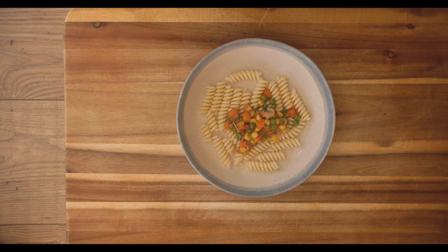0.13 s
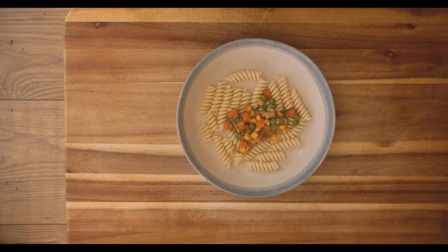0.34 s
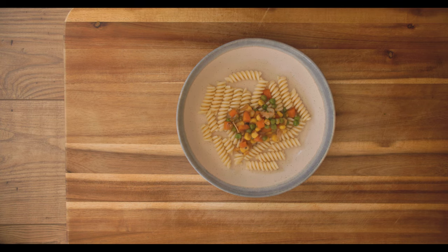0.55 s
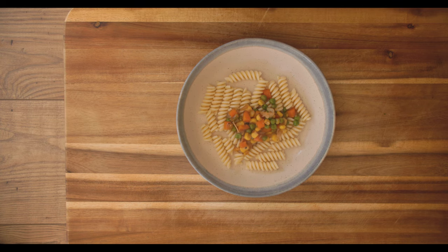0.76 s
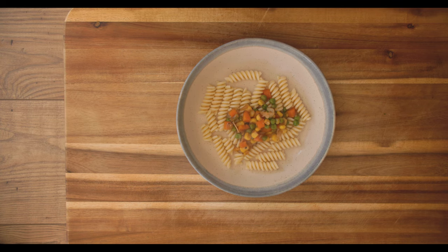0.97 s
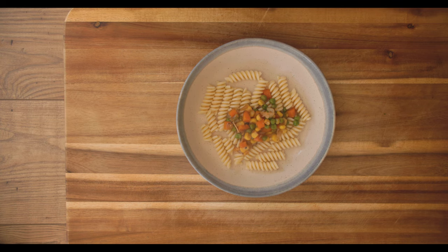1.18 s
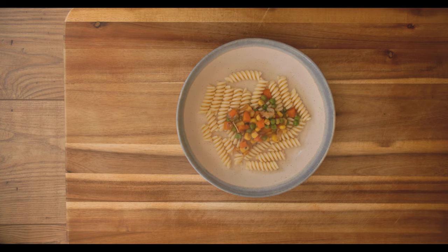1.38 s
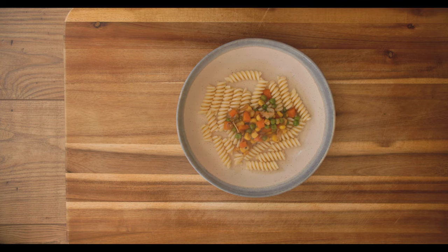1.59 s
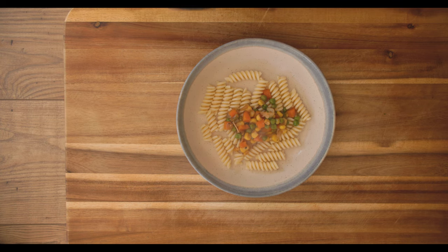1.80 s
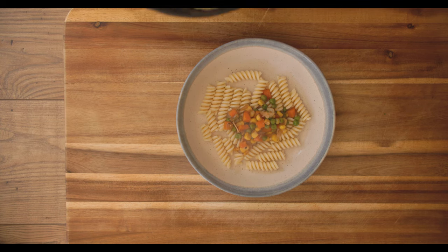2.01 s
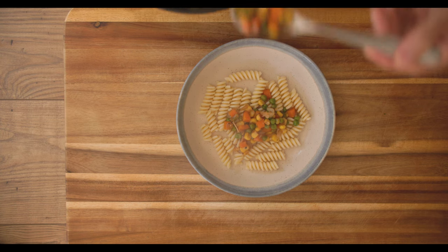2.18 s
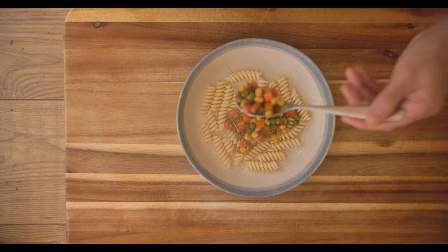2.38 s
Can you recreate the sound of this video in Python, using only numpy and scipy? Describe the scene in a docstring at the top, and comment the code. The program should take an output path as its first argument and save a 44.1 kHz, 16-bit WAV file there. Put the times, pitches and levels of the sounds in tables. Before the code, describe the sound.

Close and dry, a metal utensil hits a pan twice and scrapes hard, stops, then knocks once more, slides lightly and lifts with faint thin squeaks, over low room hum and soft hiss in a small kitchen.

```python
"""A metal utensil works a pan of sauce in a small kitchen, in two strokes over a bed of room hum and hiss.
The first stroke knocks twice and drags; the second knocks once, drags and lifts with thin squeaks.
Blows ring tuned pan modes; glancing touches wake a few of them; slides are grit noise that rasps and rings.
Wet ticks are tiny noise bursts, squeaks are gliding sines, and a dying noise tail puts it in the room."""
import sys
import numpy as np
from scipy import signal
from scipy.fft import rfft, irfft
from scipy.io import wavfile

SR = 44100
rng = np.random.default_rng(int(sys.argv[2]) if len(sys.argv) > 2 else 0)


def ratio_of_db(decibels):
    """Turn decibels (scalar or array-like) into linear amplitude factors; 0 dB maps to 1."""
    return 10 ** (np.asarray(decibels, float) / 20)


def store_wav(level_fs):
    """Save 16-bit WAV to argv[1]."""
    pcm = np.round(np.clip(np.atleast_2d(level_fs), -1, 1) * 32767)
    wavfile.write(sys.argv[1], SR, pcm.T.astype(np.int16))


N = 108045   # length [samples]

# mode pitches of pan and utensil: one list of [Hz]
MODE_HZ = [664, 1300, 1621, 1852, 1895, 2197, 2378, 2810, 2915, 3216, 3400, 3650, 3994, 4197, 4400, 4720,
           4926, 5249, 5500, 5870, 6240, 6850, 7245, 8060, 9290, 11870, 12300]
# how each mode answers: (relative level struck at the rim [dB], on the bottom [dB], reference t60 [s])
MODES = [(-15, -14, 0.39), (-14, 0.5, 0.055), (-15.5, -27, 0.19), (-27.5, -43, 0.066), (-12.5, -3, 0.25),
         (-5.5, -24, 0.2), (-21, -4, 0.15), (-38, -62, 0.12), (-23, -3.5, 0.21), (6, -19.5, 0.096),
         (-2.5, -25, 0.057), (-11, -32.5, 0.12), (-2, -30, 0.077), (-6, -11.5, 0.1), (-21, 6, 0.075),
         (-4, -65.5, 0.13), (-30, -34.5, 0.103), (-31.5, 9, 0.0522), (-17.5, -10, 0.0498), (-9, -6, 0.074),
         (-19.5, -10, 0.32), (-41.5, -14, 0.106), (-46, -15, 0.039), (-30, -1.5, .12), (-34.5, -10, 0.081),
         (-26, -24, 0.046), (-52.5, -12, 0.034)]
# blows: (time [s], level [dB], place [0 rim - 1 bottom], share of reference t60 [ratio],
#         crack over ringing [dB], top of push and crack [Hz])
BLOW_EVENTS = [(0.1974, 0.5, 0.025, 1.45, 7.5, 5100), (0.3195, 2.5, 0.19, 0.21, -8, 9100),
               (1.0495, -2.5, 0.98, 0.49, 4, 7750)]
BLOW_GAIN_DB, CHATTER_S = -13, 0.00279
FREE_S, GRIP_DB_PER_S = 0.028, 190   # a blow rings freely at first, then hand and sauce damp it
RING_WOBBLE_DB = 3.0   # shifting grip and sauce make each ring fade unevenly
CRACK_LOW_HZ, CRACK_T60_S = 1496, 0.012
BODY_DB, BODY_T60_S = -27, 0.033   # quieter, longer noise behind the crack
THUMP_DB, THUMP_HZ = -34.5, 100

# glancing touches; the first row is the second blow waking the high scoop modes: (time [s], peak level [dB],
# first pitch woken [Hz], second pitch [Hz], contact [s])
TOUCH_EVENTS = [(0.3205, -6, 8100, 11260, 0.0018), (0.335, -3, 4200, 5130, 0.0085),
                (.41, -9.5, 3400, 4300, 0.02), (0.4272, -6.5, 3080, 4400, 0.0093),
                (0.464, -6, 3260, 4200, 0.0081), (0.49, -18, 3230, 4240, 0.0044),
                (0.5016, -8, 3270, 4320, 0.0041), (1.137, -14.5, 7050, 5400, 0.0034),
                (1.148, -13.5, 2900, 6930, 0.0041), (1.16, -33, 6960, 1900, 0.0019),
                (1.19, -20.5, 1280, 2900, 0.022), (1.203, -25, 1760, 2900, 0.0084),
                (1.255, -29.5, 2480, 3550, 0.0068), (1.34, -27.5, 3360, 3770, 0.05),
                (1.36, -20, 3930, 7030, 0.015), (1.374, -18, 4100, 4680, 0.001),
                (1.399, -25.5, 2050, 4200, 0.015), (1.498, -32.5, 2950, 3220, 0.014),
                (1.512, -35.5, 3270, 3030, 0.014), (1.535, -33.5, 3230, 3120, 0.052)]
TOUCH_T60_SHARE, TOUCH_SPREAD_OCTAVES = 0.23, 0.08

# slides, one curve each: (time [s], level [dB], treble over level [dB], place [0 rim - 1 bottom],
#                          scoop ringing over treble [dB])
SLIDE_CURVES = [
    [(0.21, -16.5, -20, 0.29, -30), (0.268, -32.5, -4.5, 0.32, -14), (0.303, -24.5, -12, 0.43, -15)],
    [(0.303, -18, -10.5, 0.6, -7), (0.3175, -18, 0, 0.35, -1)],
    [(0.322, -18.5, -2.5, 0.14, -4), (0.44, -17.5, -9, 0.54, -10.5), (0.455, -27, -17.5, 0.63, -7.5)],
    [(0.458, -23, -14, 0.53, 1), (0.466, -18.5, -21, 0.41, 0.5), (0.505, -29, -19.5, 0.53, 1.5),
     (0.62, -56, -18, 0.45, -10.5)],
    [(1.056, -9, 1.5, 0.62, -15.5), (1.066, -18.5, -6.5, 1, -14), (1.205, -27.5, -5, 0.74, -3),
     (1.235, -40.5, -5.5, 1, -5.5), (1.29, -38.5, -5.5, 0.68, -3.5)],
    [(1.29, -40, 3.5, 0.88, -6.5), (1.38, -34, -5.5, 0.35, -2), (1.496, -48.5, 1.5, 0.53, -8.5)],
    [(1.496, -46, 9, 0.41, 10), (1.502, -42, 1, 0.48, -5.5), (1.572, -41.5, 1.5, 0.4, -7),
     (1.59, -44, -0.5, 0.55, -12), (1.79, -55.5, -6, 0.5, -16)],
]
# tone of the rasp: (frequency [Hz], relative density [dB per Hz])
RASP_SPECTRUM = [(240, -34), (400, -10.5), (664, -13.5), (1520, -8), (1860, -3), (5350, -12), (10700, -22),
                 (12100, -32), (15700, -48)]
RASP_DB, RUNG_DB, SPLIT_HZ = -8.5, -4.5, 5020
PRESS_T60_SHARE = 0.68   # the pressed edge shortens the rings
FIRM_DB, RUNG_FOLLOWS = -18, 0.4   # light pressure rasps more than it rings
GRIT_PER_S, GRIT_SPREAD_DB, GRIT_CAP = 6000, 3.2, 4.0
FLUTTER_DB, FLUTTER_HZ, SLIP_DB, SLIP_HZ = 1.8, 90, 1.2, 25   # fast and slower level drift

# broad resonances of the rubbed scoop: (frequency [Hz], width [Hz], relative level [dB])
SCOOP_RESONANCES = [(6950, 350, -3), (8050, 280, -2), (11900, 300, -5), (12800, 500, -16),
                    (15200, 900, -19)]
# pitch of the scoop as sauce loads it: (time [s], pitch share [ratio])
SCOOP_LOAD = [(1.05, 1), (1.2, .99), (1.3, .965), (1.46, .95), (1.56, .975)]
SCOOP_PATCHY_DB, SCOOP_SLIP_DB = 3.5, 2.5

# the lowest pan mode humming under the sliding edge, one curve each: (time [s], level [dB])
BELLY_CURVES = [
    [(0.29, -31), (0.32, -30), (0.442, -27.5), (0.5, -44.5), (0.53, -80)],
    [(1.07, -35), (1.104, -41), (1.212, -35.5), (1.27, -66)],
    [(1.37, -48.5), (1.4, -43.5), (1.49, -57), (1.53, -41), (1.58, -52)],
]
BELLY_T60_S, BELLY_FLICKER_DB = 0.05, 2.5
# a dull rumble under the drag, one curve each: (time [s], level [dB])
RUMBLE_CURVES = [
    [(.2, -46), (.31, -42)],
    [(1.49, -51.5), (1.77, -56)],
]
RUMBLE_HZ = 353
PAN_LOW_CUT_HZ = 427

# sharp ticks: first a loud tap of the utensil on the pan, then grit and wet sauce: (time [s], peak level [dB],
# centre [Hz], width [octaves])
TICK_EVENTS = [(0.369, -4, 3920, 1.4), (0.552, -48, 14530, 0.18), (.571, -43, 13660, 0.57),
               (.585, -42, 10490, 1.1), (0.6062, -28.5, 5200, 1.5), (.735, -43.5, 5800, 0.68),
               (0.832, -38, 5900, .5), (.861, -28, 7700, 1.3), (1.482, -25, 12330, 1.06),
               (1.372, -32.5, 12020, .5), (1.375, -17, 6000, 1.7), (1.521, -41, 13600, 0.13),
               (1.571, -24.5, 8700, 0.56), (1.8012, -28, 12660, 0.6)]
TICK_T60_S = 0.0021
# thin squeaks, one curve each: (time [s], pitch [Hz], level [dB])
SQUEAK_CURVES = [
    [(1.5, 10600, -70), (1.512, 11200, -55), (1.535, 12300, -59), (1.585, 13000, -63), (1.62, 12400, -58),
     (1.64, 11650, -52), (1.66, 11000, -66), (1.7, 9900, -62), (1.745, 8500, -69)],
    [(1.62, 15800, -64), (1.65, 14500, -66), (1.67, 13100, -59), (1.7, 11900, -56), (1.718, 11400, -70)],
]
SQUEAK_WAVER, SQUEAK_FLICKER_DB = 0.006, 4.5   # pitch drift [ratio], level drift

ROOM_DB, ROOM_T60_S, WALL_CUT_HZ = -16, 0.36, 3500
# tone of the room hiss: (frequency [Hz], relative density [dB per Hz])
HISS_SPECTRUM = [(8.8, -51.5), (15, -10), (59, -13.5), (74, -14.5), (145, -2), (337, -2), (368, 0.5),
                 (603, -3.5), (1020, -13), (1180, -11.5), (2900, -15.5), (3880, -16), (15700, -32.5)]
HISS_DB = -51
# wavering hum and narrow hiss bands: (frequency [Hz], width [Hz], level [dB])
HUM_BANDS = [(860, 3.3, -63.5), (997.6, 7.6, -66), (2270, 73.3, -64.5), (2900, 300, -61.5),
             (8500, 400, -69)]
CLIP_TOP = 1.0


def rms_one(x):
    """Scale to rms 1."""
    return x / np.sqrt(np.mean(x ** 2) + 1e-20)


def in_time(rows):
    """A mask of the curve's span with 3 ms fades, and its columns at every sample."""
    s, *columns = np.transpose(rows)
    t = np.arange(N) / SR
    edge = np.clip(np.minimum(t - s[0], s[-1] - t) / 0.003, 0, 1)
    return edge, [np.interp(t, s, c) for c in columns]


def level_of(curves):
    """Sum of (time [s], level [dB]) curves as a linear level."""
    return sum(edge * ratio_of_db(db) for edge, (db,) in map(in_time, curves))


def colour(x, points):
    """Shape a signal by a spectrum drawn over log frequency; rms 1."""
    hz = np.maximum(np.arange(N // 2 + 1) * SR / N, 1)
    point_hz, point_db = np.transpose(points)
    gain = ratio_of_db(np.interp(np.log(hz), np.log(point_hz), point_db))
    return rms_one(irfft(rfft(x) * gain, N))


def drift(rate_hz):
    """Random wander of rms 1: noise through two one-pole low-passes."""
    r = np.exp(-2 * np.pi * rate_hz / SR)
    noise = rng.standard_normal(N + SR)
    return rms_one(signal.lfilter([1], [1, -2 * r, r * r], noise)[SR:])


def ring(x, hz, t60):
    """A two-pole resonator: a unit click sets a dying sine of starting height near 1 ringing."""
    r, w = ratio_of_db(-60 / (max(t60, 0.002) * SR)), 2 * np.pi * hz / SR
    return signal.lfilter([0, np.sin(w)], [1, -2 * r * np.cos(w), r * r], x + 1e-18)


def band(x, low_hz, high_hz):
    """Band-pass."""
    edges = [low_hz, min(high_hz, 0.45 * SR)]
    return signal.sosfilt(signal.butter(2, edges, "band", fs=SR, output="sos"), x)


def add_at(out, s, x):
    """Mix a short sound in at a time in seconds."""
    start = int(s * SR)
    out[start:start + len(x)] += x


def blows():
    """Each blow chatters briefly into every mode, weighted by where it lands, with a noise crack."""
    out, t = np.zeros(N + SR), np.arange(SR // 2) / SR
    rim_db, bottom_db, t60 = np.transpose(MODES)
    onset = np.minimum(t / 0.03, 1)   # the wobble grows in after the hit
    grip = ratio_of_db(-GRIP_DB_PER_S * np.maximum(t - FREE_S, 0))
    crack_fade = ratio_of_db(-60 * t / CRACK_T60_S) + ratio_of_db(BODY_DB - 60 * t / BODY_T60_S)
    for s, db, place, share, crack_db, top_hz in BLOW_EVENTS:
        noise = rng.standard_normal(len(t))
        push = 0.1 * noise * np.exp(-t / CHATTER_S)
        push[0] = 0.7
        push = signal.lfilter([1], [1, -np.exp(-2 * np.pi * top_hz / SR)], push)
        push /= np.sqrt(np.sum(push ** 2))
        gains = ratio_of_db(BLOW_GAIN_DB + rim_db + np.clip(place, 0, 1) * (bottom_db - rim_db))
        # each mode reads its own stretch of one wobble
        wobble = RING_WOBBLE_DB * drift(11)
        starts = rng.integers(0, N - len(t), len(MODES))
        rings = np.zeros(len(t))
        for gain, hz, decay, k in zip(gains, MODE_HZ, t60, starts):
            rings += gain * ratio_of_db(onset * wobble[k:k + len(t)]) * ring(push, hz, decay * share)
        crack = band(noise[::-1] * crack_fade, CRACK_LOW_HZ, top_hz)
        add_at(out, s, ratio_of_db(db) * (rings * grip + ratio_of_db(crack_db) * crack))
    return out[:N]


def thumps():
    """The low push of each blow: a click through a one-pole low-pass."""
    clicks = np.zeros(N)
    clicks[[int(row[0] * SR) for row in BLOW_EVENTS]] = ratio_of_db(THUMP_DB)
    return signal.lfilter([1], [1, -np.exp(-2 * np.pi * THUMP_HZ / SR)], clicks + 1e-18)


def touches():
    """A short rub wakes the modes around two pitches, damped by the contact."""
    out, t = np.zeros(N), np.arange(SR // 8) / SR
    for s, db, one_hz, other_hz, contact in TOUCH_EVENTS:
        push = rng.standard_normal(len(t)) * t * np.exp(-4 * t / max(contact, 0.0005))
        gains = np.zeros(len(MODE_HZ))
        for centre_hz in (one_hz, other_hz):
            octaves_away = np.log2(np.array(MODE_HZ) / centre_hz)
            gains += 1 / (1 + (octaves_away / TOUCH_SPREAD_OCTAVES) ** 4)
        rings = sum(gain * ring(push, hz, t60 * TOUCH_T60_SHARE)
                    for gain, hz, (_, _, t60) in zip(gains, MODE_HZ, MODES))
        rings = band(rings, min(one_hz, other_hz) / 2, max(one_hz, other_hz) * 1.4)
        add_at(out, s, ratio_of_db(db) * rings / abs(rings).max())
    return out


def slides():
    """Dense grit under the edge rasps, drives the damped pan modes and rubs the scoop."""
    sizes = ratio_of_db(GRIT_SPREAD_DB * np.minimum(rng.exponential(1, N), GRIT_CAP)) * rng.choice([-1, 1], N)
    grains = sizes * (rng.random(N) < GRIT_PER_S / SR)
    flutter = ratio_of_db(FLUTTER_DB * drift(FLUTTER_HZ) + SLIP_DB * drift(SLIP_HZ))
    grit = rms_one(grains + 0.45 * rng.standard_normal(N)) * flutter

    low, high, place, rub = np.zeros((4, N))
    for rows in SLIDE_CURVES:
        edge, (db, treble_db, where, scoop_db) = in_time(rows)
        low += edge * ratio_of_db(db)
        high += edge * ratio_of_db(db + treble_db)
        rub += edge * ratio_of_db(db + treble_db + scoop_db)
        place = np.where(edge > 0, np.clip(where, 0, 1), place)

    rasp = colour(grit, RASP_SPECTRUM)
    dull = signal.sosfilt(signal.butter(4, SPLIT_HZ, fs=SR, output="sos"), rasp)
    bright = signal.sosfilt(signal.butter(4, SPLIT_HZ, "high", fs=SR, output="sos"), rasp)
    out = ratio_of_db(RASP_DB) * (low * rms_one(dull) + high * rms_one(bright))
    out += rub * flutter * ratio_of_db(SCOOP_SLIP_DB * drift(2 * SLIP_HZ)) * scoop()

    gains = [ratio_of_db(rim + place * (bottom - rim)) for rim, bottom, _ in MODES]
    total = np.sqrt(sum(gain ** 2 for gain in gains))
    drive = grit * low * (low / ratio_of_db(FIRM_DB)) ** RUNG_FOLLOWS
    for hz, gain, (_, _, t60) in zip(MODE_HZ, gains, MODES):
        t60 = max(t60 * PRESS_T60_SHARE, 0.002)
        # the root evens out the build-up of long rings
        out += ratio_of_db(RUNG_DB) * ring(drive * gain / total, hz, t60) / np.sqrt(t60 * SR / 28)
    return out


def scoop():
    """Noise bands around the scoop resonances, their pitch moving with the load of sauce; rms 1."""
    _, (share,) = in_time(SCOOP_LOAD)
    out = np.zeros(N)
    for hz, width_hz, db in SCOOP_RESONANCES:
        r = np.exp(-np.pi * width_hz / SR)
        a, b = signal.lfilter([1], [1, -2 * r, r * r], rng.standard_normal((2, N)))
        phase = 2 * np.pi * hz * np.cumsum(share) / SR
        noise_band = rms_one(a * np.cos(phase) + b * np.sin(phase))
        out += ratio_of_db(db + SCOOP_PATCHY_DB * drift(40)) * noise_band
    return rms_one(out)


def belly():
    """Noise through the lowest pan mode, flickering in level."""
    hum = rms_one(ring(rng.standard_normal(N), MODE_HZ[0], BELLY_T60_S))
    return level_of(BELLY_CURVES) * ratio_of_db(BELLY_FLICKER_DB * drift(28)) * hum


def rumble():
    """Low noise in a half-octave band."""
    noise = band(rng.standard_normal(N), RUMBLE_HZ / 2 ** 0.25, RUMBLE_HZ * 2 ** 0.25)
    return level_of(RUMBLE_CURVES) * rms_one(noise)


def ticks():
    """A utensil tap, grit and wet sauce: tiny dying noise bursts, each in a band of its own."""
    out, t = np.zeros(N), np.arange(SR // 50) / SR
    for s, db, hz, octaves in TICK_EVENTS:
        edges = hz * 2 ** (-octaves / 2), hz * 2 ** (octaves / 2)
        burst = rng.standard_normal(len(t)) * ratio_of_db(-60 * t / TICK_T60_S)
        burst = band(band(burst, *edges), *edges)   # twice for steep sides
        add_at(out, s, ratio_of_db(db) * burst / abs(burst).max())
    return out


def squeaks():
    """Gliding near-sines that waver in pitch and flicker in level."""
    out = np.zeros(N)
    for rows in SQUEAK_CURVES:
        edge, (hz, db) = in_time(rows)
        phase = 2 * np.pi * np.cumsum(hz * (1 + SQUEAK_WAVER * drift(80))) / SR
        level = edge * ratio_of_db(db + SQUEAK_FLICKER_DB * drift(61))
        out += np.sqrt(2) * level * np.sin(phase)
    return out


def kitchen(x):
    """Reverb from a dying noise tail, duller as it goes because its bright part dies sooner."""
    t = np.arange(SR) / SR
    walls, bright = rng.standard_normal((2, SR))
    dull = signal.sosfilt(signal.butter(1, WALL_CUT_HZ, fs=SR, output="sos"), walls)
    tail = dull * ratio_of_db(-60 * t / ROOM_T60_S) + 0.5 * bright * ratio_of_db(-60 * t / (0.6 * ROOM_T60_S))
    tail *= t > 0.004   # a short gap before the room answers
    return signal.fftconvolve(x, tail / np.sqrt(np.sum(tail ** 2)))[:N]


def room_tone():
    """Nearly steady shaped hiss, with hum and narrow bands made by noise through resonators."""
    hum = np.zeros(N)
    for hz, width_hz, db in HUM_BANDS:
        t60 = np.log(1000) / (np.pi * width_hz)
        hum += ratio_of_db(db) * rms_one(ring(rng.standard_normal(N), hz, t60))
    hiss = colour(rng.standard_normal(N), HISS_SPECTRUM)
    return ratio_of_db(HISS_DB + 0.2 * drift(9.4)) * hiss + hum


def scene():
    """Pan and sauce in the kitchen, as one channel."""
    low_cut = signal.butter(3, PAN_LOW_CUT_HZ, "high", fs=SR, output="sos")
    pan = signal.sosfilt(low_cut, blows() + touches() + slides() + belly())
    pan = pan + ticks() + squeaks() + rumble()
    mix = pan + thumps() + ratio_of_db(ROOM_DB) * kitchen(pan) + room_tone()
    return mix[None]


def top_cut(x):
    """Nothing passes above the cut-off."""
    return signal.sosfilt(signal.butter(12, 15830, fs=SR, output="sos"), x)


def record(dry):
    """Any peak past full scale clips flat."""
    mix = np.clip(dry, -CLIP_TOP, CLIP_TOP)
    return top_cut(mix)


dry = scene()
out = record(dry)
store_wav(out)
```